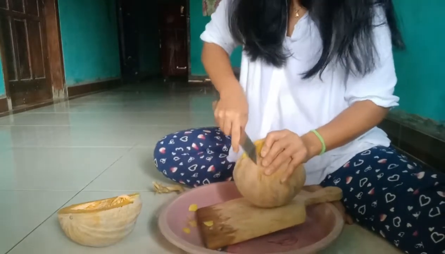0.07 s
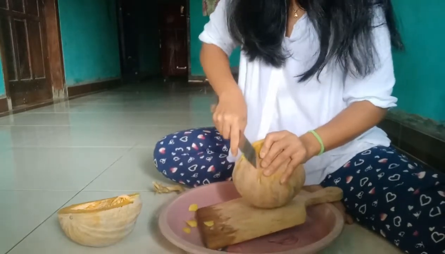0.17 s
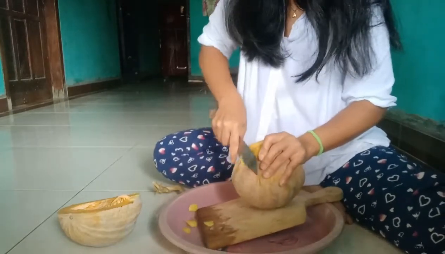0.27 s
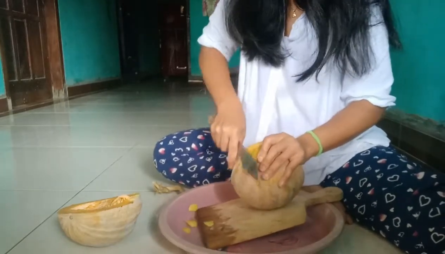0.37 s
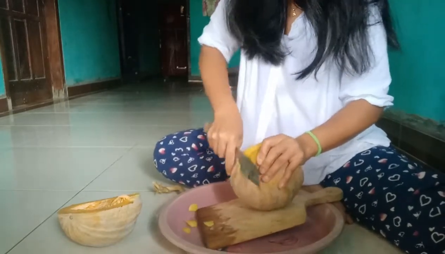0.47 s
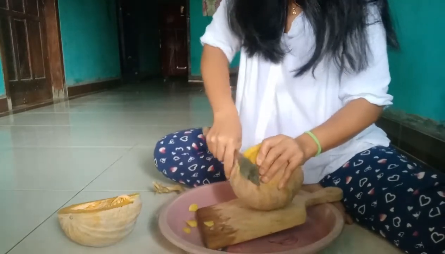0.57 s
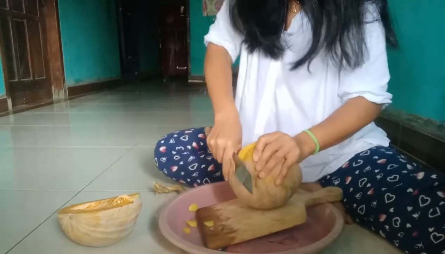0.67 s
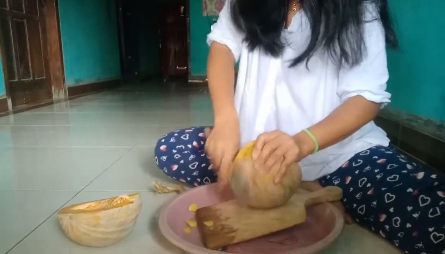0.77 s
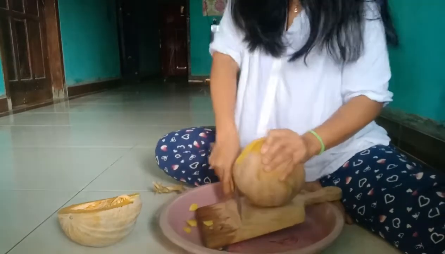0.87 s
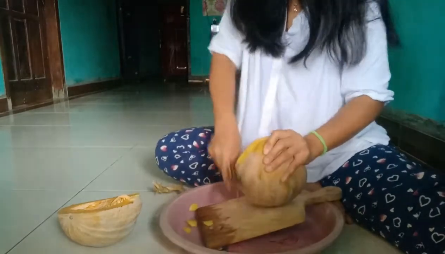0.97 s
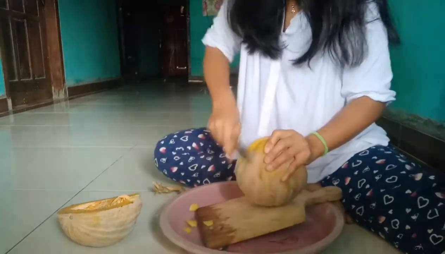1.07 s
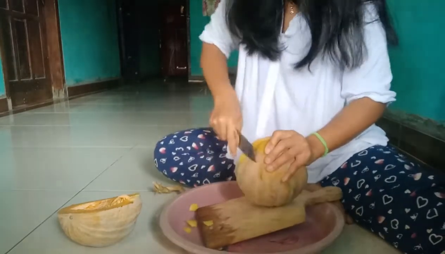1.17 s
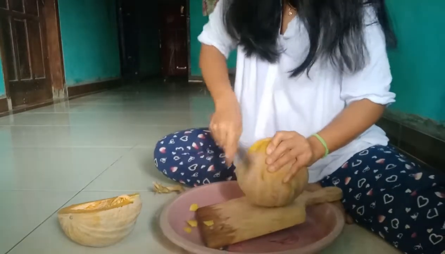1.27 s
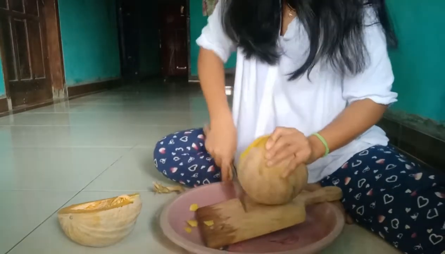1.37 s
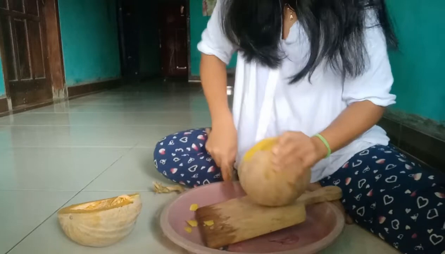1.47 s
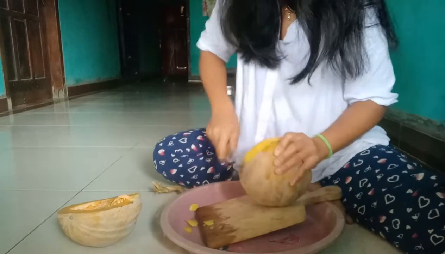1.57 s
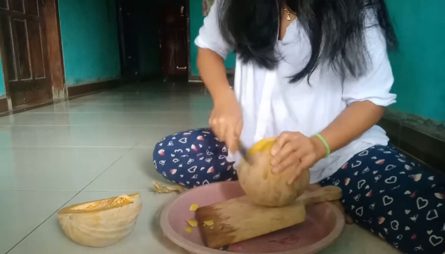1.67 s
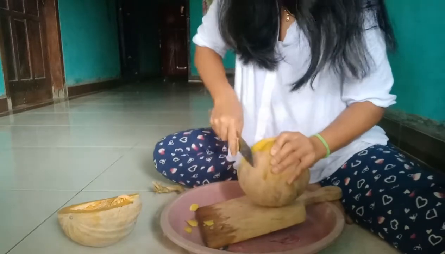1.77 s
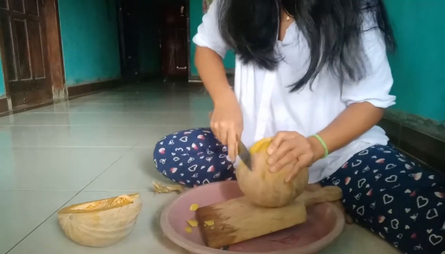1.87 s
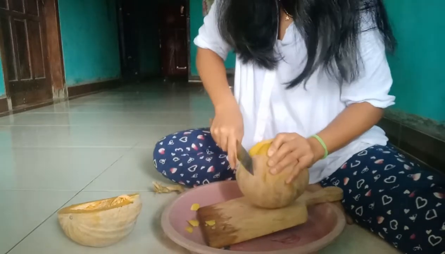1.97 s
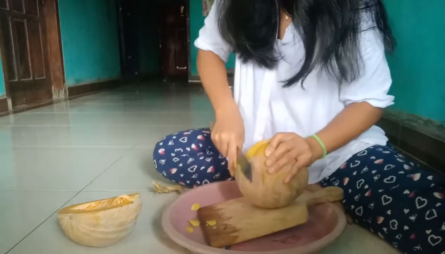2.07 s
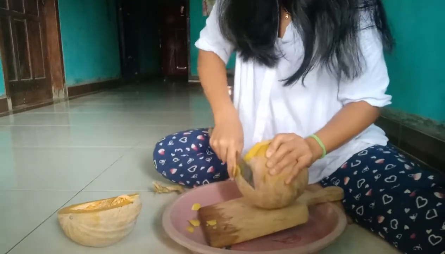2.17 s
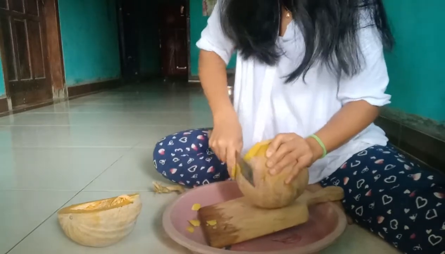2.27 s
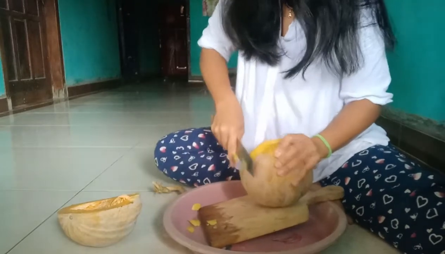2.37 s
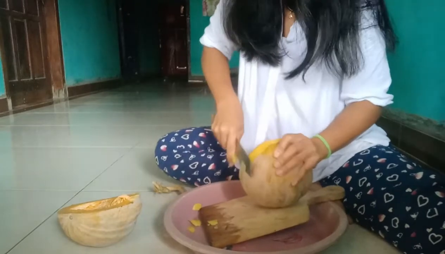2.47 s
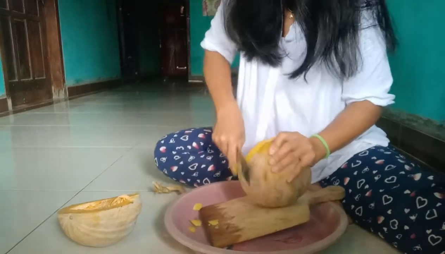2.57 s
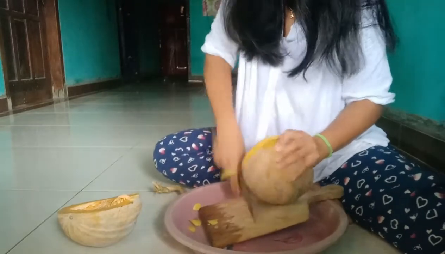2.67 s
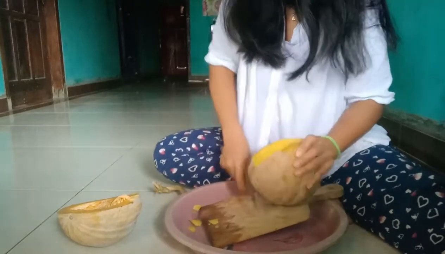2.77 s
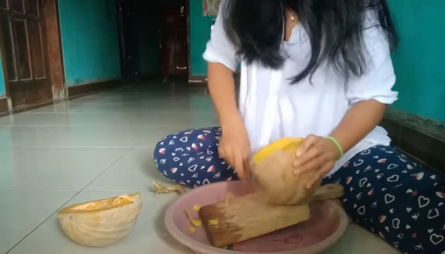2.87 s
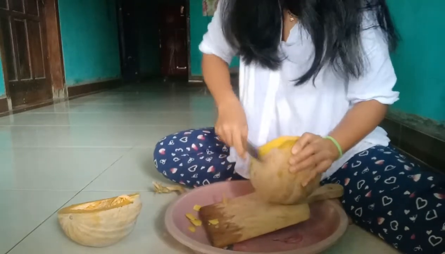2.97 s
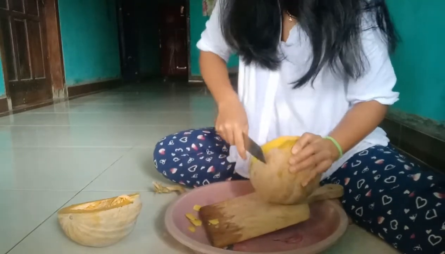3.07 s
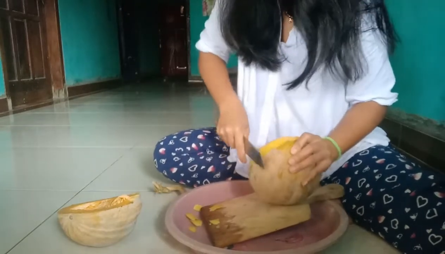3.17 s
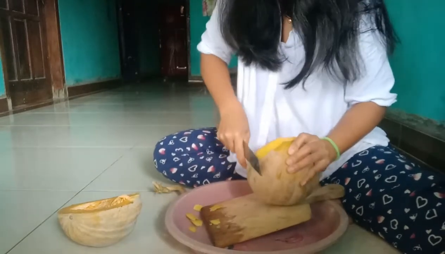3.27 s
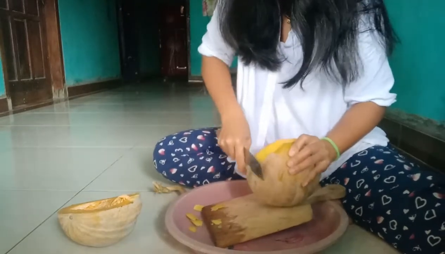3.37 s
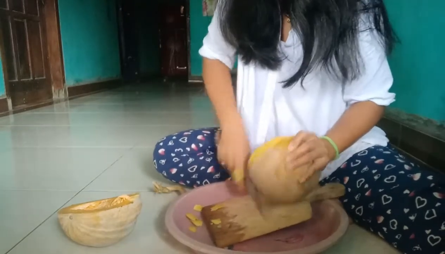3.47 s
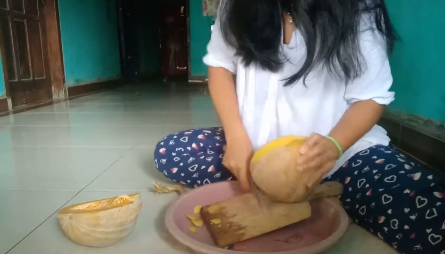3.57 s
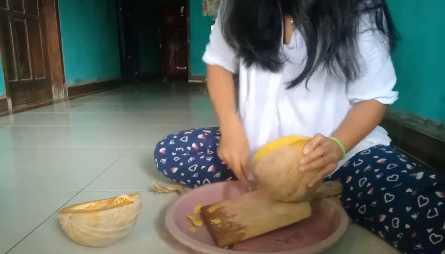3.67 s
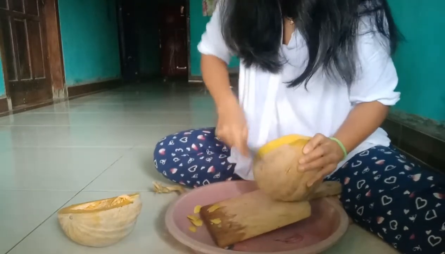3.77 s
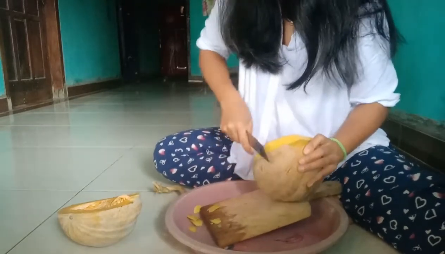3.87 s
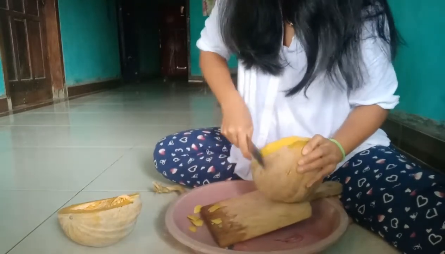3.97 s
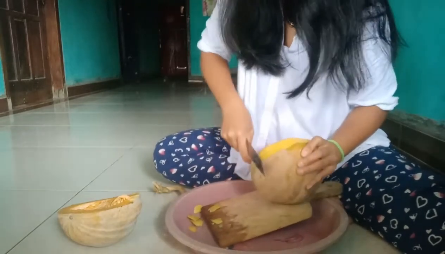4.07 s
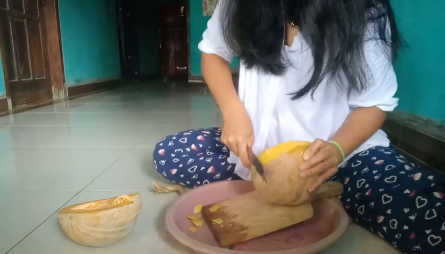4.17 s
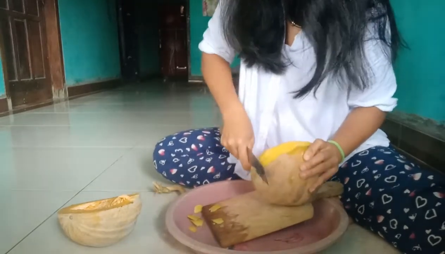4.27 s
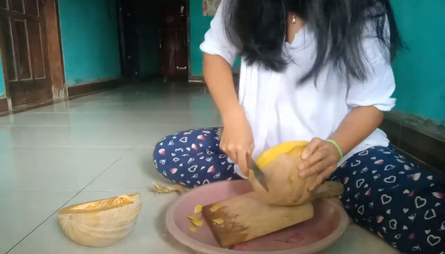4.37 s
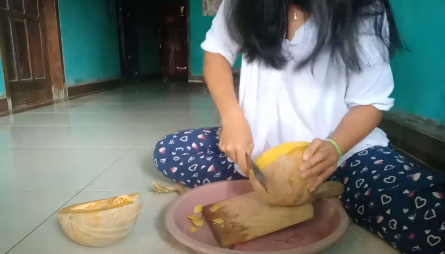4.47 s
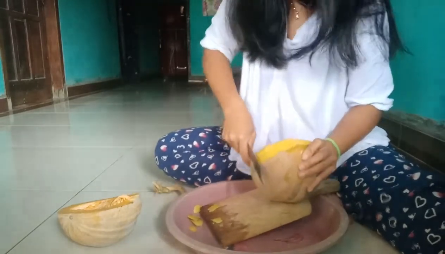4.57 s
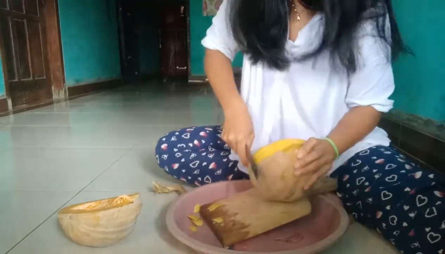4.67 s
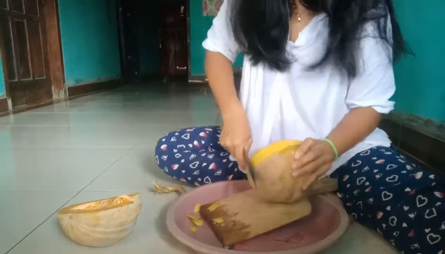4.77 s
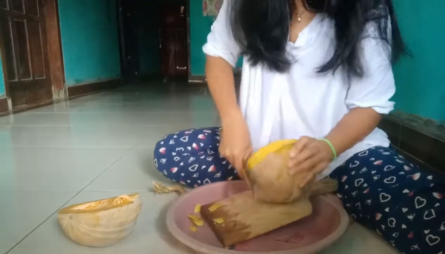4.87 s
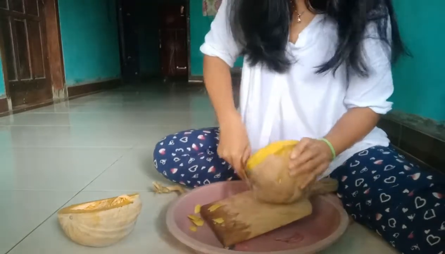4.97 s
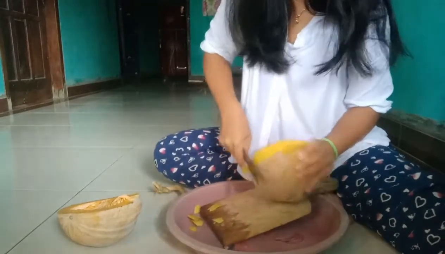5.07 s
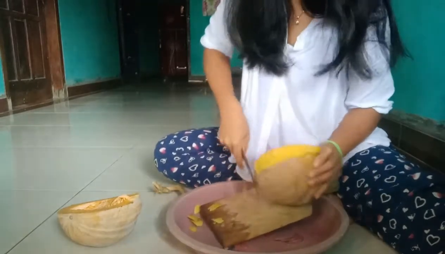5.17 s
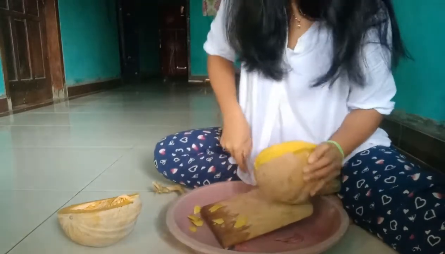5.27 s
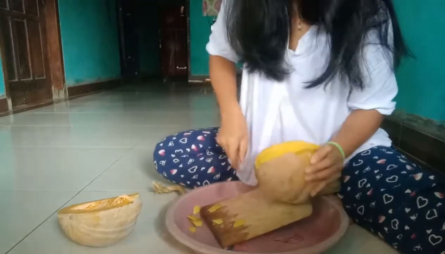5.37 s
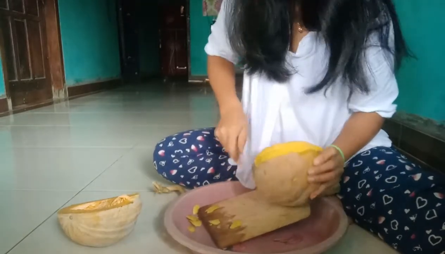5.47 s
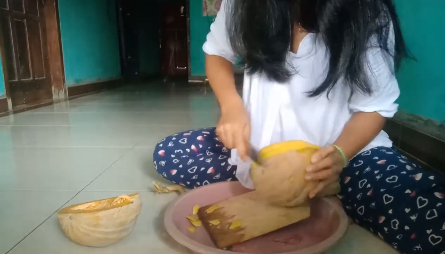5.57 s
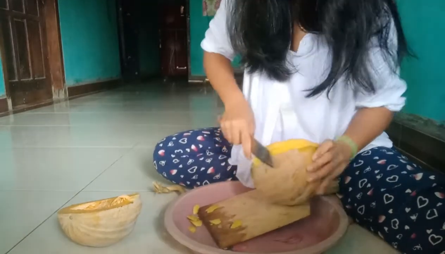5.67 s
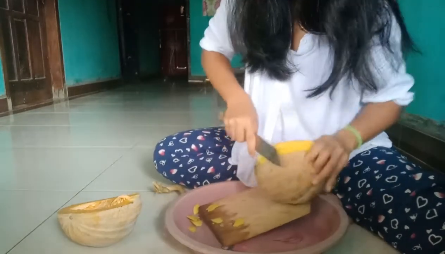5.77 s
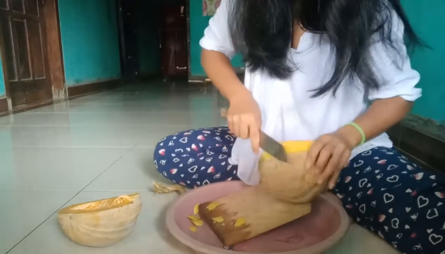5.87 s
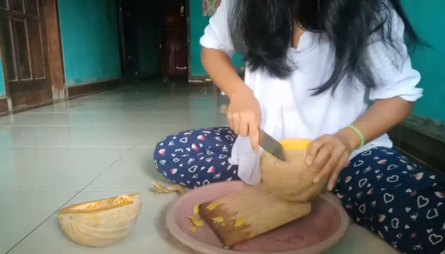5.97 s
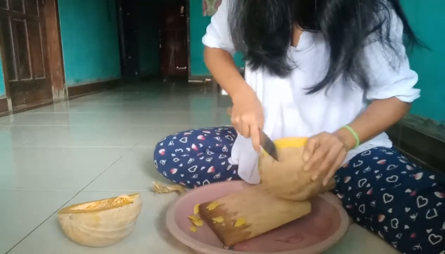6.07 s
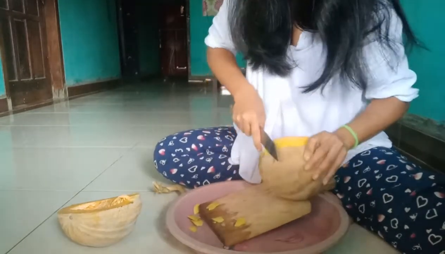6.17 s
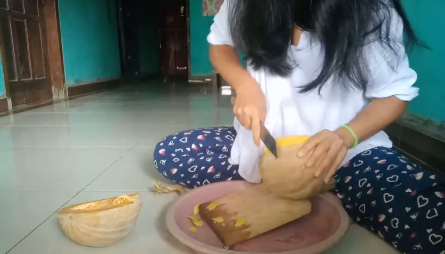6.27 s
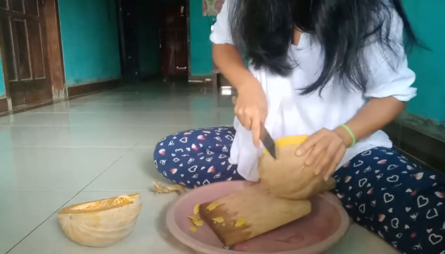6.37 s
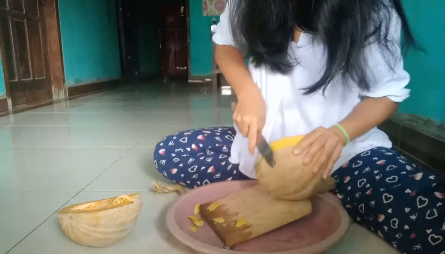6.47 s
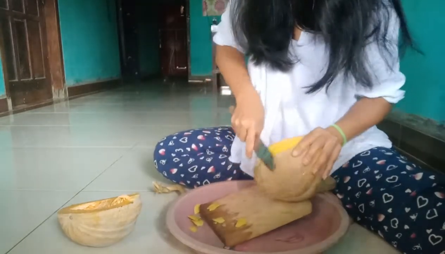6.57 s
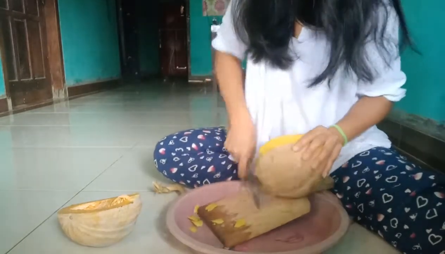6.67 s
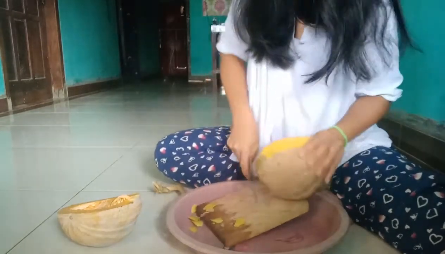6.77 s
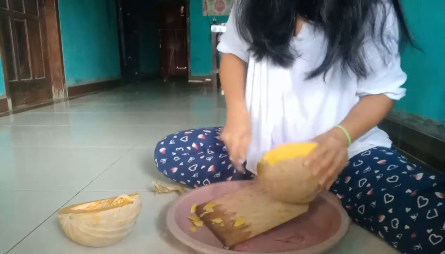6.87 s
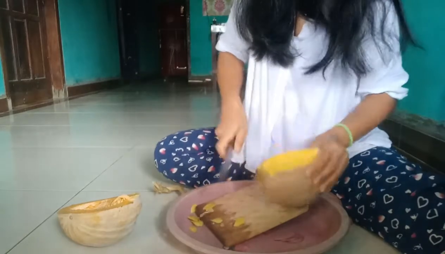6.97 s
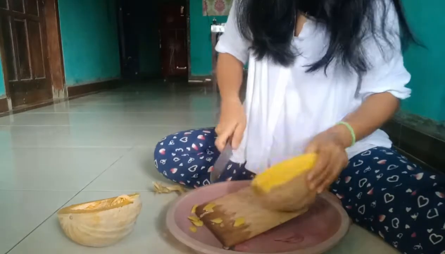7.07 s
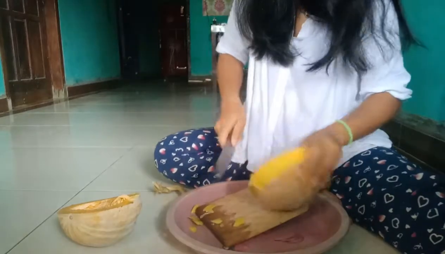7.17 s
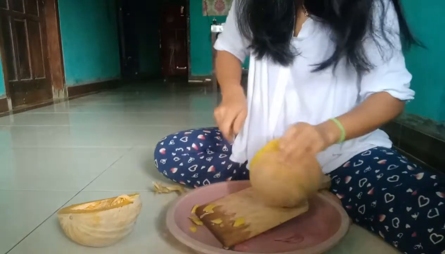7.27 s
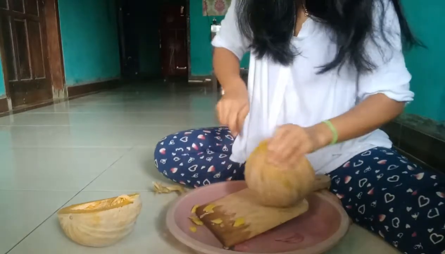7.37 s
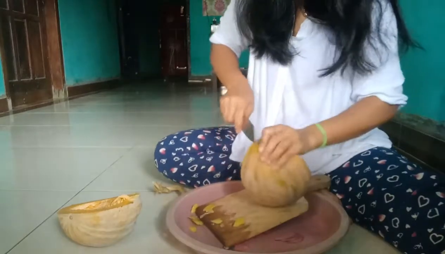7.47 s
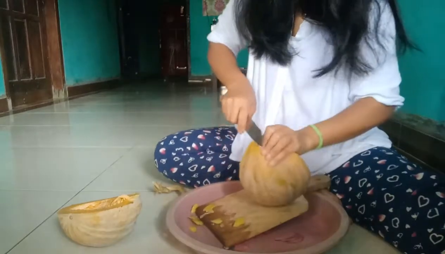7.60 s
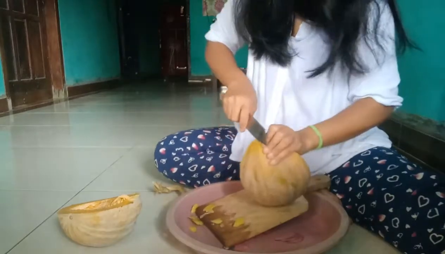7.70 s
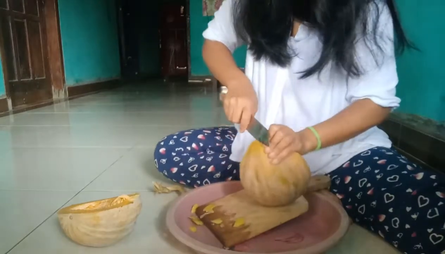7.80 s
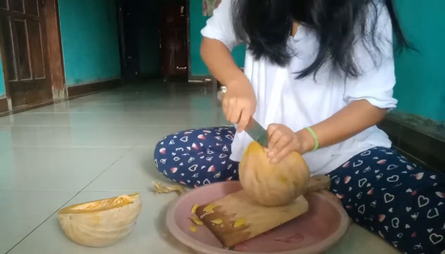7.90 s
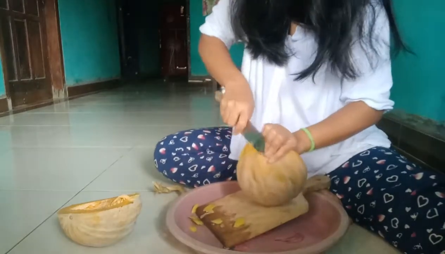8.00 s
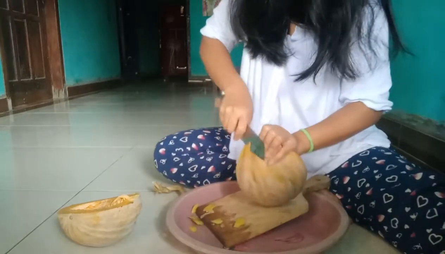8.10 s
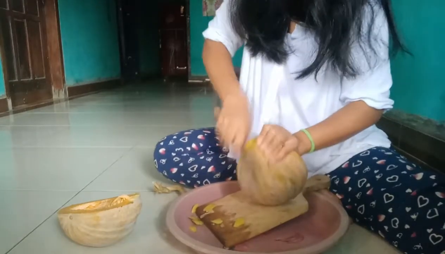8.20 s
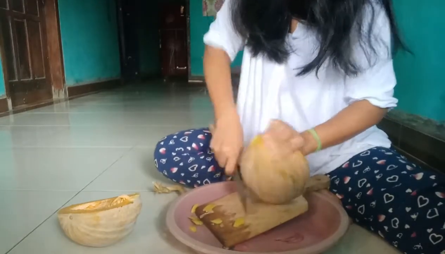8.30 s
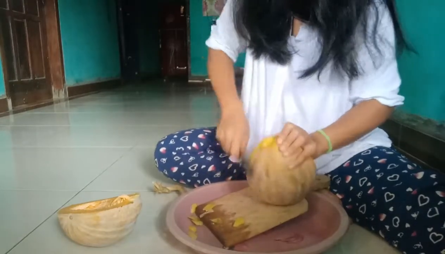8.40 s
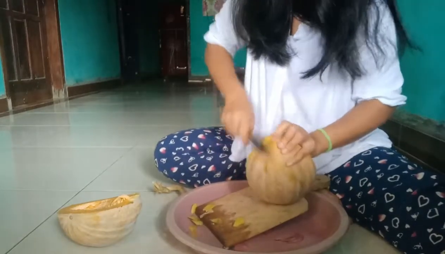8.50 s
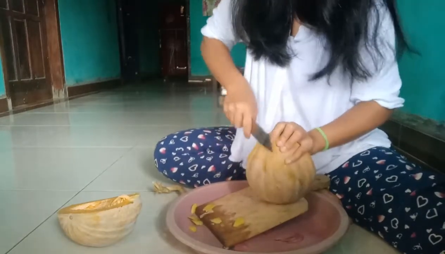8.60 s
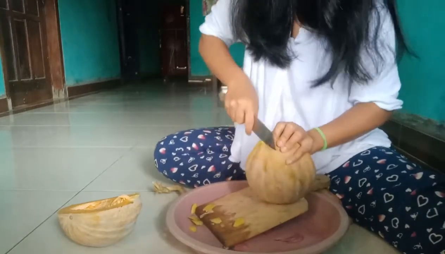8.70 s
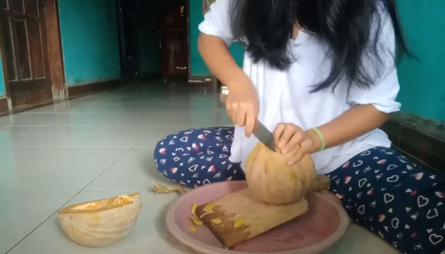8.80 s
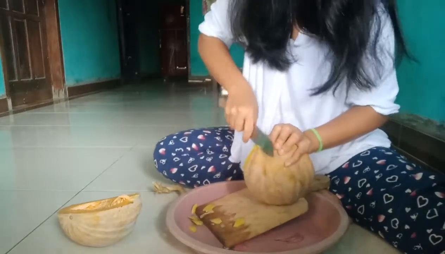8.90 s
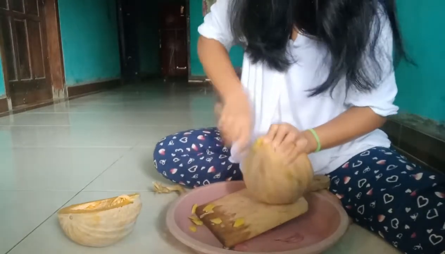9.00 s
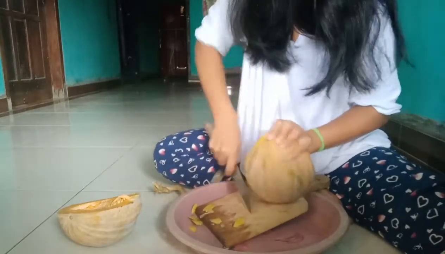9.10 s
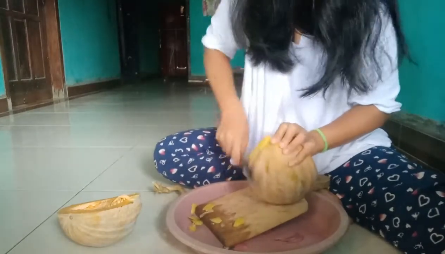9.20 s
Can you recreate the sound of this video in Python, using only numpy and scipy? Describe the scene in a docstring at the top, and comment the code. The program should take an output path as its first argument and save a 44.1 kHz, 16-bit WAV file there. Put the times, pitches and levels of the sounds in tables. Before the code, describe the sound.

Soft, gritty scraping and small dry snaps come from a knife cutting the rind off a pumpkin. Six sharp knocks on a wooden board interrupt at uneven intervals, ringing briefly off tiled walls and slightly overloading the nearby phone microphone. The pauses are hushed, with faint house noise and a low hum. Late on, a far-off motorbike and a few short calls from a fowl drift in from outside.

```python
"""A knife scrapes through hard pumpkin rind, close by in a bare tiled room: fibres tear and snap, the blade
slips through and knocks the board, and a loose tray thuds under it. The walls answer each knock.
Late on, from outside, a distant motorbike throbs and a fowl calls, over house noise and a low hum.
The microphone is a phone's: it clips the hardest blows and hushes the pauses."""
import sys
import numpy as np
from scipy import signal
from scipy.fft import rfft, irfft
from scipy.io import wavfile
from scipy.ndimage import uniform_filter1d

SR = 44100
rng = np.random.default_rng(int(sys.argv[2]) if len(sys.argv) > 2 else 0)


def bounce(signal):
    """Save signal as a 16-bit WAV file at the path given by the first command-line argument."""
    frames = np.transpose(np.atleast_2d(signal))
    limited = np.clip(frames, -1, 1)
    pcm = np.round(limited * 32767).astype(np.int16)
    wavfile.write(sys.argv[1], SR, pcm)


N = 407464
T = np.arange(N) / SR
HIT_SAMPLES, GAIN_STEP_SAMPLES = 5000, 32


def blows():
    """Each contact rings board and tray under a crack; returns the close sound and what the walls get."""
    # knocks of blade and pumpkin: start_s, level_db, centre_hz, then relative crack_db, thud_db, room_db
    knocks = [(0.054, -35, 840, -26, -32, -2), (0.116, -34.5, 905, -12, -15, -4.5),
              (0.655, -47, 923, -22, -23, -1.5), (0.8, -35, 907, 1.5, -15, 3),
              (0.823, -19.5, 1157, -7, -8, 1.5), (0.853, -1.5, 1250, -16, -27, -4),
              (1.322, -35, 681, -12, -26, 3.5), (1.407, 4.5, 950, -21, -24, -3.5),
              (1.718, -46, 1172, -17, 3.5, -7), (2.305, -31.5, 1325, -7, -37.5, -8),
              (2.66, -31.5, 958.3, -4.5, -4.5, 1.5), (2.705, 3, 880, -18, -21, -2.5),
              (2.726, 4.5, 780, -17, -17, -1.5), (3.063, -28.5, 829, -28, -19.5, -1.5),
              (3.142, -36.5, 1090, -21, -25.5, -1.95), (3.483, -38, 939, 3.5, -2.5, 3.5),
              (3.519, 4, 863, -17.5, -30.5, 0.5), (3.551, -0.2, 740, -13, -10, -4),
              (3.974, -55.5, 1050, -4, -1.5, -1), (4.687, -30.5, 764, -18, -22.5, -20.5),
              (4.904, -37.5, 1080, -23, -14.5, -11), (5.065, -41, 502.5, -6, -14, 9),
              (5.078, -35, 893, 11.5, -25.5, -15.5), (5.241, -22, 1180, -6.5, -43.5, -1),
              (5.639, -45, 848, -21, -13.5, 0.5), (5.81, -24.5, 850, -24, -26.5, -2),
              (5.85, -31, 974, -20, -30.5, -7), (6.492, -42.5, 700, -17.5, -17.5, -7.5),
              (6.633, -28, 902, -3, -19.5, -0.6), (6.651, -34, 891, -8.5, 3, -0.8),
              (6.68, 3.5, 1038, -11, -19.5, -0.15), (6.697, -1.4, 619, -22.5, -14, 0.5),
              (6.993, -29.5, 776, -28.5, -8.5, 1.2), (7.41, -27.5, 802, -21, -24, 0.4),
              (8.241, -28, 742, -5, -30.5, -17), (8.384, -30.5, 790, -16, -19, 1),
              (8.428, -20.5, 790, -28.5, -41, -7.5), (8.451, -31, 960, -15, -8.5, -2.5),
              (8.472, -34, 1700, -5, -33, -14.5), (8.569, -34, 750, -7, -13, -7),
              (8.672, -31, 687, -14.5, -13.5, 0), (9.043, -35, 800, -15.5, -26, -6),
              (9.084, -39.5, 694, 4, 2, -2), (9.112, 5, 1145, -14.5, -32, -7)]
    # modes of the board: pitch_hz, level_db, t60_s
    board_modes = [(548, -6.5, 0.015), (711, -1.5, 0.018), (808, -1.1, 0.024), (936, -4.5, 0.025),
                   (1105.6, 1.5, 0.036), (1286, -6, 0.037), (1441.5, -1.5, 0.026), (1616, -13, 0.05)]
    # modes of the tray: pitch_hz, level_db, t60_s
    tray_modes = [(160, 0, 0.061), (207, -1.1, 0.046), (264, -1, 0.089), (291, 4.5, 0.045),
                  (349, 4.5, 0.055)]
    # spectrum of the blade's crack: frequency_hz, level_db
    crack_spectrum = [(1300, -26.5), (2000, 5.5), (2600, -1), (3300, -2), (4100, -6.5), (4800, -17.5),
                      (5600, -26), (7000, -47.5)]
    contact_ms = 1.7
    near, sent = np.zeros((2, N + HIT_SAMPLES))
    for start_s, db, centre_hz, crack_db, thud_db, room_db in knocks:
        crack = level(shaped(HIT_SAMPLES, crack_spectrum), 3.5) * swell(0.3 * contact_ms, t60_s=0.0075)
        spread_oct = max(0.78 + 0.014 * db, .25)  # harder blows wake more of the board's modes
        board = ring(board_modes, contact_ms, centre_hz, spread_oct)
        tray = ring(tray_modes, rise_ms=3.5)  # the loose tray answers late
        knock = board + undb(thud_db) * tray + undb(crack_db) * crack
        i = int(start_s * SR)
        near[i:i + HIT_SAMPLES] += undb(db) * knock
        sent[i:i + HIT_SAMPLES] += undb(db + room_db) * knock
    return near[:N], sent[:N]


def ring(modes, rise_ms, centre_hz=None, spread_oct=1, scatter_db=2.23):
    """Damped modes, peak 1; the place of the blow favours those near a centre."""
    hz, db, t60_s = np.transpose(modes)[:, :, None]
    scatter, detune, offset = rng.standard_normal((3, len(modes), 1))
    if centre_hz:
        db = db - 6 * (np.log2(hz / centre_hz) / spread_oct) ** 2
    phase = 2 * np.pi * (hz * (1 + 0.02 * detune) * T[:HIT_SAMPLES] + offset)
    tone = np.sum(undb(db + scatter_db * scatter) * swell(rise_ms, t60_s) * np.sin(phase), axis=0)
    return tone / np.abs(tone).max()


def scrape():
    """Fibres tear in dense uneven clicks heard through rind and blade edge; the finest ones only hiss."""
    # strokes of blade and hands: peak_s, rise_s, fall_s, level_db, then relative edge_db, fine_db
    strokes = [(0.002, .01, 0.052, -46, -14, -30), (0.12, 0.055, 0.045, -52, 4, -10),
               (0.33, .5, .3, -49, -28, -30), (0.439, .05, 0.033, -54, -8, -16),
               (0.662, .08, 0.066, -43.5, -9, -22), (0.839, 0.07, .008, -43, -6, -23.5),
               (1.328, 0.023, 0.19, -43, -0.5, -15.5), (1.87, .06, .12, -49.5, -9, -28),
               (2.11, 0.22, .05, -46, -5, -24), (2.333, 0.036, .05, -48.5, -8, -18.5),
               (2.536, 0.12, .15, -56.5, -11, -19), (2.695, .045, 0.0093, -40, -11, -22),
               (3.2, .05, 0.16, -52, -9, -32), (3.501, .14, 0.009, -41, -6, -22),
               (3.981, 0.016, .08, -58.5, 10.5, -6.5), (4.332, 0.031, .12, -55, -4, -24.5),
               (4.6, 0.029, 0.14, -49.5, -17, -30.5), (4.71, 0.15, .04, -46, -6.5, -31),
               (4.903, 0.074, 0.021, -53, -1.3, -15), (5.066, .004, .15, -54, 21.5, 10.5),
               (5.202, 0.17, .03, -45, -5.5, -25), (5.27, 0.014, 0.082, -51.5, 10, -27),
               (5.713, .08, .15, -50.5, -11, -30), (6.493, .015, .09, -47, -9, -17),
               (6.608, .02, 0.0065, -51, -2.2, -9.5), (6.66, .06, .008, -49, 2, -5),
               (7.15, 0.052, .2, -50.5, -7.5, -20), (7.405, 0.021, 0.042, -42, -31, -45),
               (7.58, .15, 0.36, -50.5, -9.5, -24), (7.95, .4, .1, -52.5, -11.5, -21),
               (8.191, 0.25, .04, -47, -8, -28.5), (8.247, 0.044, .19, -39, -10, -23),
               (8.465, 0.09, 0.47, -44.5, -28, -50), (8.9, 0.62, 0.83, -47, -10, -28),
               (9.045, 0.024, 0.052, -36, -13.5, -22)]
    # spectrum of the tearing rind: frequency_hz, level_db
    rind = [(150, -34.5), (330, -8), (600, -6), (800, 2.5), (950, 1.5), (1200, -7), (1500, -10),
            (2000, -13), (2600, -45)]
    # spectrum of the blade edge: frequency_hz, level_db
    edge = [(1500, -32.5), (2200, -4), (3350, 4.5), (4200, -4), (5200, -19), (5800, -40.5)]
    # spectrum of the finest hiss: frequency_hz, level_db
    fine = [(5000, -24), (6400, 5), (7500, -3), (10000, -12), (14000, -4.5), (16000, -11.5)]
    clicks_per_s = 4800
    powers = sum((hump(peak_s, rise_s, fall_s, db) * undb([[0], [edge_db], [fine_db]])) ** 2
                 for peak_s, rise_s, fall_s, db, edge_db, fine_db in strokes)
    sizes = undb(3 * np.minimum(rng.exponential(1, N), 3.5)) * rng.standard_normal(N)
    clicks = level(sizes * (rng.random(N) < clicks_per_s / SR), 0)
    tearing = clicks + .6 * rng.standard_normal(N)
    layers = [level(colour(tearing, spectrum), 0) for spectrum in (rind, edge, fine)]
    grip = undb(1.3 * walk(40))
    return grip * sum(smooth(np.sqrt(power)) * layer for power, layer in zip(powers, layers))


def snaps():
    """Each rind fibre parts at the blade with one short, dry, wide-band click."""
    # parting fibres: start_s, peak_db, top_db (the spectrum's level at top_hz)
    fibres = [(0.1101, -48, -24), (0.6554, -44, -16), (0.8006, -31, -12), (0.8225, -40, -23),
              (0.85, -41, -24), (1.319, -53, -18), (1.3683, -43, -7), (1.4056, -41.5, -24),
              (1.4301, -50, -28), (2.3057, -50.5, -19), (2.66, -40, -15), (2.684, -38.5, -20),
              (2.704, -38, -14), (2.7268, -27.5, -20), (3.459, -49, -6), (3.484, -34, -15),
              (3.5189, -30, -22), (3.5505, -30, -22), (5.0723, -34, -10), (5.0761, -25, -21),
              (5.24, -35.5, -26), (6.4877, -61, -16), (6.6009, -59, 5), (6.6308, -27.5, -23),
              (6.6805, -27.5, -20), (6.697, -25.5, -22), (8.2177, -45, -7), (8.2387, -37.5, -14),
              (8.8034, -58, -15), (9.0394, -50, -11), (9.0848, -47, 2), (9.1152, -31.5, -21)]
    # spectrum of a snap below its top: frequency_hz, level_db
    spectrum = [(2000, -17), (3500, -4.5), (5200, -8), (6600, -2.5), (8000, -9)]
    top_hz = 11000
    out = np.zeros(N + HIT_SAMPLES)
    for start_s, peak_db, top_db in fibres:
        click = shaped(HIT_SAMPLES, spectrum + [(top_hz, top_db)]) * swell(rise_ms=0.6, t60_s=0.017)
        i = int(start_s * SR)
        out[i:i + HIT_SAMPLES] += undb(peak_db) * click / np.abs(click).max()
    return out[:N]


def walls(sound):
    """Floor and near walls answer thinly, the far wall brings the full tail; octaves die at their own pace."""
    # decay of the tiled room: frequency_hz, t60_s
    decay = [(100, 0.96), (260, 0.77), (700, 0.46), (1840, 0.51), (4850, 0.3), (10000, 0.2)]
    far_wall_s, tiles_db_per_oct = 0.026, 1.5
    t, tail = T[:SR], 0
    hz, t60_s = np.transpose(decay)
    for f in 80 * 2. ** np.arange(8):
        band = shaped(SR, [(f / 2, -40), (f / 1.7, -3), (f, 0), (f * 1.6, -3), (f * 2, -40)])
        band *= undb(tiles_db_per_oct * np.clip(np.log2(f / 1000), 0, 2.5))  # hard tiles answer brightly
        tail = tail + band * undb(-60 * t / np.interp(np.log(f), np.log(hz), t60_s))
    tail *= np.where(t < far_wall_s, 0.58 * np.clip(t / 0.0097, 0, 1), 1)
    return signal.fftconvolve(sound, tail / np.sqrt(np.sum(tail ** 2)))[:N]


def fowl():
    """A fowl outside calls in short gliding notes of two partials, hoarse with fast waver and flutter."""
    # notes of the call: start_s, length_s, pitch_hz, glide_hz_per_s, level_db, relative second_partial_db
    notes = [(7.985, .085, 648, -60.5, -52, 3), (8.269, .13, 748, 42, -49.5, -14),
             (8.448, 0.07, 571, 300, -46, -24), (8.528, 0.11, 735, -500, -50.5, -8),
             (8.68, 0.049, 601, 60, -44.5, -12.5)]
    attack_s, release_s = 0.017, 0.034
    waver, flutter = 1 + 0.023 * walk(120), undb(2.1 * walk(50))
    out = np.zeros(N)
    for start_s, length_s, hz, glide, db, second_db in notes:
        on = (T > start_s) & (T < start_s + length_s + release_s)
        t = T[on] - start_s
        phase = 2 * np.pi * np.cumsum((hz + glide * t) * waver[on]) / SR
        fade = np.clip(np.minimum(t / attack_s, (length_s - t) / release_s + 1), 0, 1)
        out[on] += np.sqrt(2) * fade * undb(db) * (np.sin(phase) + undb(second_db) * np.sin(2 * phase))
    return out * flutter


def motorbike():
    """A single cylinder far off: low multiples of the firing rate, which sags as it leaves."""
    # bursts of throttle: peak_s, rise_s, fall_s, level_db
    bursts = [(7.5, .3, 0.41, -54), (8.35, .35, .75, -49.5)]
    firing_hz, sag_hz_per_s, leaves_s = 38.4, 2.1, 7.3
    harmonics_db = [-27, -4, -1, -6.5, -12, -15.5, -13.5]
    hz = firing_hz - sag_hz_per_s * np.maximum(T - leaves_s, 0)
    phase = 2 * np.pi * np.cumsum(hz * (1 + 0.014 * walk(12))) / SR
    tone = sum(undb(db) * np.cos(k * phase) for k, db in enumerate(harmonics_db, 1))
    throttle = smooth(sum(hump(*burst) for burst in bursts))
    return level(tone, 0) * throttle * undb(2.5 * walk(13))


def outside_hum():
    """A narrow band of low noise from outside swells and sinks."""
    # course of the hum: time_s, level_db
    course = [(0, -63.5), (.35, -59.5), (.95, -48.5), (1.3, -64), (1.85, -62.5), (2.1, -50.5), (2.3, -58.5),
              (2.999, -54.5), (3.4, -62), (4.7, -61), (5.2, -54.5), (5.5, -62.5), (6.6, -61), (7.0, -58),
              (9.24, -62.5)]
    hz = 113
    hum = shaped(N, [(hz - 70, -50), (hz - 35, -18), (hz, 0), (hz + 40, -18), (hz + 150, -80)])
    time_s, db = np.transpose(course)
    return level(hum, 0) * undb(np.interp(T, time_s, db))


def house_noise():
    """Steady room tone that wavers a little."""
    # spectrum of the room tone: frequency_hz, level_db
    spectrum = [(30, -12.5), (70, 0.5), (160, -3), (260, -2.5), (550, -0.14), (1150, -2.4), (1500, -4.5),
                (4300, -13.5), (5300, -26.5), (6400, -25), (9000, -32.5), (16000, -34.5)]
    waver = undb(.8 * walk(6))
    return level(shaped(N, spectrum), -53.5) * waver


def undb(db):
    """Decibels to gain."""
    return 10 ** (np.asarray(db) / 20)


def level(x, db):
    """Scales a sound to an RMS level."""
    return x * undb(db) / np.sqrt(np.mean(x ** 2))


def colour(x, spectrum):
    """Filters a sound by a curve of (frequency_hz, level_db) points."""
    hz, db = np.transpose(spectrum)
    f = np.fft.rfftfreq(len(x), 1 / SR) + 1
    return irfft(rfft(x) * undb(np.interp(np.log(f), np.log(hz), db)), len(x))


def shaped(count, spectrum):
    """Noise with the given spectrum."""
    return colour(rng.standard_normal(count), spectrum)


def walk(rate_hz):
    """Smooth random wander, spread 1."""
    width = int(SR / rate_hz)
    return level(uniform_filter1d(uniform_filter1d(rng.standard_normal(N), width), width), 0)


def swell(rise_ms, t60_s):
    """Envelope that grows while the contact lasts, then dies away."""
    t, rise_s = T[:HIT_SAMPLES], rise_ms / 1000
    attack = np.sin(np.pi / 2 * np.clip(t / rise_s, 0, 1)) ** 2
    return attack * undb(-60 * np.maximum(t - rise_s, 0) / t60_s)


def hump(peak_s, rise_s, fall_s, db):
    """Coarse gain that climbs 17 dB per rise time to its peak and sinks 17 dB per fall time."""
    corners_s = [peak_s - 4 * rise_s, peak_s, peak_s + 4 * fall_s]
    return undb(np.interp(T[::GAIN_STEP_SAMPLES], corners_s, db - 17 * np.array([4, 0, 4])))


def smooth(gain):
    """Coarse gain to one value per sample."""
    return np.interp(T, T[::GAIN_STEP_SAMPLES], gain)


def scene():
    """What reaches the microphone, in mono: close knife work, the room's answer and the sounds outside."""
    knocks, sent = blows()
    scraping, bird, snapping = scrape(), fowl(), snaps()
    direct = knocks + snapping + undb(-2) * scraping + undb(4) * bird
    room = walls(undb(-3) * (sent + snapping) + undb(-11.5) * scraping + undb(-6.5) * bird)
    return (direct + room + motorbike() + outside_hum() + house_noise())[None]


def record(dry):
    """The phone turns quiet stretches down, bass and top less; loud blows clip and the top is cut."""
    depth_db, threshold_db, knee_db, cutoff_hz = -18.5, -46, 3.5, 15600
    bass = signal.sosfiltfilt(signal.butter(2, 190, fs=SR, output="sos"), dry)
    top = signal.sosfiltfilt(signal.butter(2, 7500, "high", fs=SR, output="sos"), dry)
    middle = dry - bass - top
    power = uniform_filter1d(middle ** 2, int(.03 * SR))
    over_db = 10 * np.log10(power + 1e-12) - threshold_db
    hush_db = depth_db / (1 + np.exp(over_db / knee_db))
    hushed = middle * undb(hush_db) + top * undb(.55 * hush_db) + bass * undb(.42 * hush_db)
    hushed = signal.sosfilt(signal.butter(2, 70, "high", fs=SR, output="sos"), hushed)
    clipped = hushed / (1 + np.abs(hushed) ** 6) ** (1 / 6)
    return signal.sosfilt(signal.ellip(8, .2, 70, cutoff_hz, fs=SR, output="sos"), clipped)


dry = scene()
out = record(dry)
bounce(out)
```